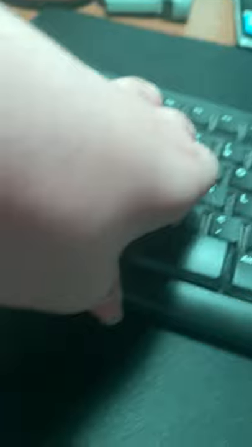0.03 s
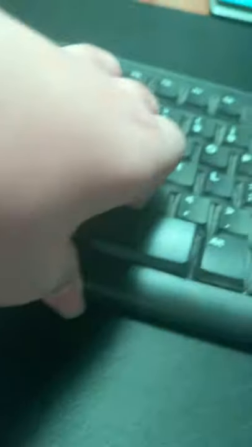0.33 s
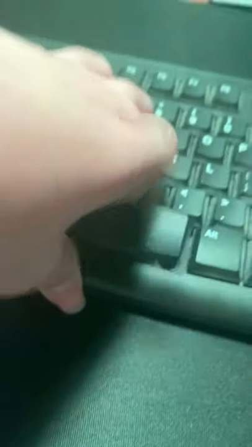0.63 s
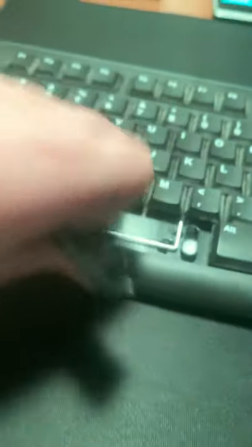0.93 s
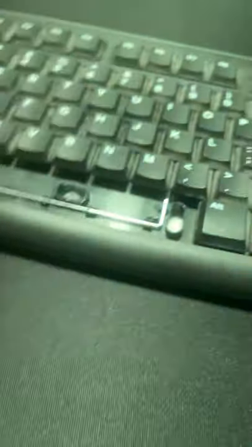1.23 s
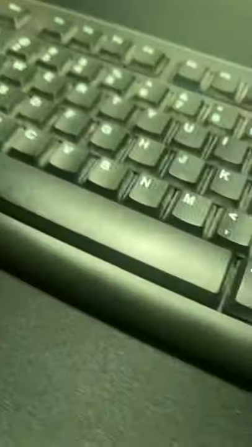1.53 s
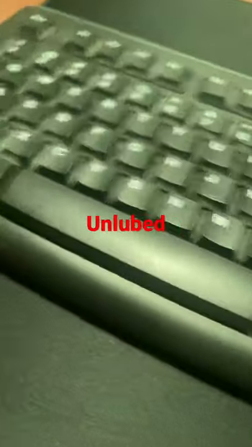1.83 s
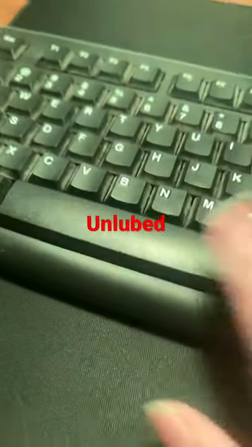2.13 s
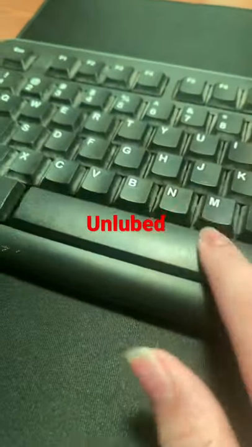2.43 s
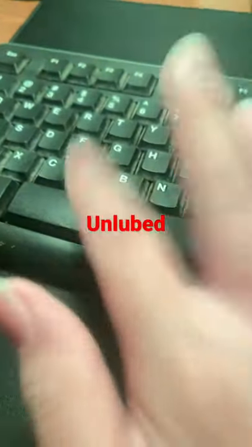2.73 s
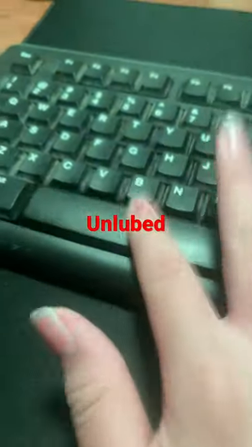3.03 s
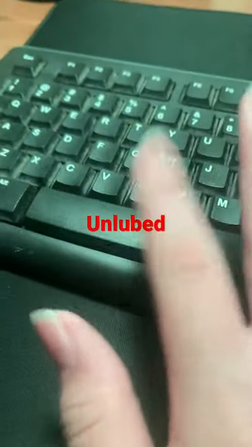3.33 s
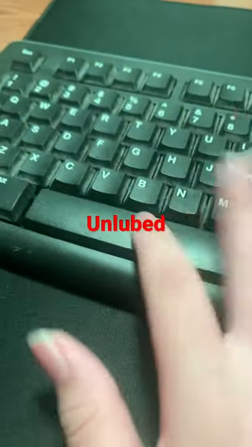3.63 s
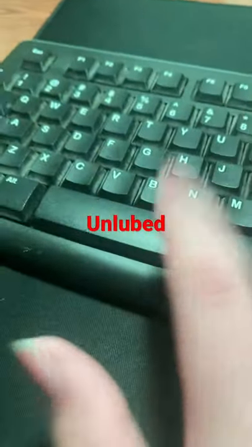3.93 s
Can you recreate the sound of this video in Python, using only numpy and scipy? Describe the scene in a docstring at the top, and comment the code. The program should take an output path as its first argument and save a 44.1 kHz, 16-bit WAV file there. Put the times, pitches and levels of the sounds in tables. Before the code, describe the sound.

Sharp, rattly spacebar presses follow a plastic key snapping off and soft handling bumps.

```python
"""First come soft thumps and rubbing: fingers on a hand-held phone in a quiet room. Close by, a plastic
spacebar snaps off a keyboard on a desk. The fingers fumble on, and all sound drops out for an instant.
Then the refitted, unlubricated spacebar is struck nine times: each press clacks, rattles the wire that
keeps the bar level and booms faintly in the desk, and the key knocks back up a moment later."""
import sys
import numpy as np
from scipy import signal
from scipy.fft import irfft
from scipy.io import wavfile
from scipy.ndimage import uniform_filter1d

SR = 44100
rng = np.random.default_rng(int(sys.argv[2]) if len(sys.argv) > 2 else 0)


def output_pcm(signal):
    """Save a mono or channel-first signal as 16-bit PCM at the path in sys.argv[1].

    Samples are clipped to [-1, 1] before scaling.
    """
    pcm = np.clip(np.atleast_2d(signal).T, -1, 1) * 32767
    wavfile.write(sys.argv[1], SR, np.round(pcm).astype(np.int16))


N = 176400


def amp(db):
    """Turns decibels into a gain."""
    return 10 ** (np.asarray(db) / 20)


def unit_rms(x):
    """Scales a sound to an average (rms) level of 1."""
    return x / np.sqrt(np.mean(x ** 2) + 1e-20)


def look_up(points, hz):
    """Reads between a table's rows on a log-frequency axis."""
    f, value = np.transpose(points)
    return np.interp(np.log(hz + 1), np.log(f), value)


def add(mix, s, sound):
    """Mixes a sound in at s seconds."""
    part = mix[max(round(s * SR), 0):][:len(sound)]
    part += sound[:len(part)]


def noise(colour, size, tilt_db=0):
    """Noise with a colour (a level for each frequency); tilt_db per octave brightens it above 1 kHz."""
    hz = np.fft.rfftfreq(size, 1 / SR)
    gain = amp(look_up(colour, hz) + tilt_db * np.log2(np.maximum(hz, 1000) / 6000))
    return unit_rms(irfft(gain * np.exp(2j * np.pi * rng.random(len(hz))), size))


def burst(colour, t60, rise_s, tilt_db=0):
    """A struck thing rings at many pitches at once: noise that fades by 60 dB in t60 seconds."""
    t = np.arange(SR // 2) / SR
    return noise(colour, len(t), tilt_db) * (1 - np.exp(-t / rise_s)) * amp(-60 * t / t60)


def ring(tones, rise_s, detune):
    """A few fading tones, a little different at every blow."""
    t, out = np.arange(SR // 2) / SR, 0
    for (hz, db, t60), (shift, vary) in zip(tones, rng.uniform(-1.06, 1, (len(tones), 2))):
        tone = np.sin(2 * np.pi * hz * (1 + detune * shift) * t + np.pi * vary / 2)
        out = out + amp(db + 2 * vary - 60 * t / t60) * tone
    return out * (1 - np.exp(-t / rise_s))


# Colour of the quiet room: f/Hz, level/dB
HUSH_COLOUR = [(20, -29.5), (72, -1), (350, -31.5), (750, -10.5), (1700, -35.5), (3500, -31.5), (4300, -41),
               (7000, -36.5), (15000, -47.5)]
def room_hush():
    """The room's faint, steady, low noise."""
    return amp(-62) * noise(HUSH_COLOUR, N)


# How long the echo lasts: f/Hz, t60/s
ECHO_FADE = [(900, 0.25), (5000, 0.47), (15000, 0.41)]
def room_echo(sound, delay_s=0.0069):
    """The walls of a small room send the sound back, each pitch fading at its own speed."""
    hz, t, bands = signal.stft(rng.standard_normal(SR * 3 // 4), SR, nperseg=256)
    fade = amp(-60 * t / look_up(ECHO_FADE, hz)[:, None])
    tail = signal.istft(bands * fade, SR, nperseg=256)[1]
    tail *= np.clip(np.arange(len(tail)) / SR / delay_s - 1, 0, 1)
    return signal.fftconvolve(sound, tail / np.linalg.norm(tail))[:N]


# Colour of a deep thump: f/Hz, level/dB
THUMP_COLOUR = [(28, -31.5), (55, 4), (80, 3.5), (300, -17), (3000, -95.5)]
# How the rumble swells and fades: t/s, level/dB
RUMBLE_LEVELS = [(.85, -54.5), (1.05, -57), (1.3, -50.5), (1.9, -52), (2.6, -69.5)]
def hand_rumble():
    """The phone rumbles in the hand that holds it."""
    level_db = np.interp(np.arange(N) / SR, *np.transpose(RUMBLE_LEVELS))
    return amp(level_db) * noise(THUMP_COLOUR, N)


# Colours of the phone's case and of a plastic tick: f/Hz, level/dB
CASE_COLOUR = [(380, -7), (570, 6.5), (780, 1.5), (1000, -13.5), (6000, -105)]
TICK_COLOUR = [(200, -23), (700, 5), (1200, 0), (2000, -14), (3200, -23.5), (6000, -30.5), (15000, -63.5)]
# Finger slides: t/s, length/s, murmur level/dB, hiss level/dB
FINGER_RUBS = [(0.234, 0.16, -50.5, -55.5), (0.458, 0.16, -41.5, -56.5), (1.206, 0.19, -52, -93),
               (1.621, 0.092, -58.5, -64), (1.714, 0.074, -52, -58), (1.816, 0.067, -48.5, -65),
               (2.029, 0.08, -51.5, -53)]
def finger_rubs():
    """Skin slides with an uneven grip: it hisses and makes the case murmur."""
    out, size = np.zeros(N), SR // 2
    for s, length, murmur_db, hiss_db in FINGER_RUBS:
        progress = np.arange(0, 1, 1 / (length * SR))
        grip = amp(2 * unit_rms(uniform_filter1d(rng.standard_normal(size), size=260)))
        murmur = amp(murmur_db) * noise(CASE_COLOUR, size)
        hiss = amp(hiss_db) * noise(TICK_COLOUR, size, tilt_db=5)
        swell = np.sqrt(abs(np.sin(np.pi * progress)))
        add(out, s, (grip * (murmur + hiss))[:len(swell)] * swell)
    return out


# Clunks and ticks: t/s, level/dB, treble tilt/(dB per octave)
PLASTIC_TICKS = [(0.267, -30, 3), (0.559, -32.5, 5.5), (1.131, -45, 1.5), (1.505, -25.5, -1),
                 (1.514, -25.5, -13), (1.63, -37, -2.5), (1.901, -47, 4.5), (1.923, -48.5, 3.5),
                 (1.968, -46.5, 2.5)]
def plastic_ticks():
    """Small knocks on plastic die away at once."""
    out = np.zeros(N)
    for s, db, tilt_db in PLASTIC_TICKS:
        add(out, s, amp(db) * burst(TICK_COLOUR, t60=0.027, rise_s=0.00023, tilt_db=tilt_db))
    return out


def push(colour):
    """One push on the phone, its low notes lagging behind its high ones."""
    hz = np.fft.rfftfreq(SR // 4, 1 / SR)
    delay_s = 0.0067 * (200 / np.maximum(hz, 45)) ** 0.879
    phase = -2 * np.pi * np.cumsum(delay_s) * hz[1]
    wave = irfft(amp(look_up(colour, hz)) * np.exp(1j * phase))[:SR // 8]
    fade_in = np.minimum(np.arange(len(wave)) / 20, 1)
    return fade_in * wave / abs(wave).max()


# Bumps on the phone: t/s, thump level/dB, knock level/dB
FINGER_BUMPS = [(0.107, -26.5, -40.5), (.167, -46, -31), (1.301, -30.5, -26), (1.506, -23, -48),
                (1.540, -31, -45.5), (1.684, -38, -65), (1.727, -71, -35), (1.78, -37.5, -65),
                (1.853, -41, -35.5), (1.924, -36.5, -74), (2.094, -24.5, -30)]
def finger_bumps():
    """A finger hits the phone: a deep thump plus a knock from the case."""
    out = np.zeros(N)
    for s, thump_db, knock_db in FINGER_BUMPS:
        add(out, s - 0.001, amp(thump_db) * push(THUMP_COLOUR) + amp(knock_db) * push(CASE_COLOUR))
    return out


# Colour of a crack: f/Hz, level/dB
CRACK_COLOUR = [(450, -52), (680, -3), (1020, 0), (1500, -9.5), (2250, -4), (2650, -19.5), (3150, 0),
                (4350, -12), (7000, -4.5), (8500, -13.5), (15000, -18.5), (16200, -39.5)]
# The clips let go: t/s, level/dB
CLIP_CRACKS = [(0.7004, -42.5), (0.7084, -21), (0.7114, -16.5), (0.7185, -20.5), (0.728, -35.5)]
def spacebar_snap():
    """The bar tears out of its clips in a quick cluster of cracks."""
    out = np.zeros(N)
    for s, db in CLIP_CRACKS:
        add(out, s, amp(db) * burst(CRACK_COLOUR, t60=0.052, rise_s=0.00075))
    return out


# Tones of the hollow bar, its "thock": f/Hz, level/dB, t60/s
THOCK_TONES = [(675, -14, 0.043), (953, 3, 0.033), (1003, 1.5, 0.016)]
# Colour of the key's click: f/Hz, level/dB
CLICK_COLOUR = [(350, -24), (750, -6), (1400, 2.5), (2050, -3), (3600, 4.5), (4400, -6.5), (6200, 0),
                (15500, -11)]
# Light knocks of the key: t/s, click level/dB, thock level/dB
KEY_RETURNS = [(0.895, -38.5, -42.5), (2.336, -37.5, -71), (2.535, -47, -45.5), (2.7247, -38, -38.5),
               (2.92, -41, -61), (3.121, -34, -33), (3.333, -32, -34), (3.538, -32.5, -32.5),
               (3.762, -33, -32), (3.982, -30.5, -33)]
def spacebar_returns():
    """The key springs back, or a finger taps it: a soft click and a hollow thock."""
    out = np.zeros(N)
    for s, db, thock_db in KEY_RETURNS:
        add(out, s, amp(db) * burst(CLICK_COLOUR, t60=0.05, rise_s=0.0017))
        add(out, s + 0.0015, amp(thock_db) * ring(THOCK_TONES, rise_s=0.0014, detune=0.041))
    return out


# Colour of the clack: f/Hz, level/dB
CLACK_COLOUR = [(350, -29), (700, 8.5), (1900, 2), (2300, -1), (3150, 4), (3900, 5), (4500, -2),
                (6100, 7.5), (8700, -4), (9400, 6.5), (10800, 2), (11400, -7), (12100, 0), (13100, -3),
                (15200, -6), (16200, -26)]
# Tones of the wire: f/Hz, level/dB, t60/s
WIRE_TONES = [(3580, 1, 0.046), (3665, 5, 0.044), (3920, -10.5, 0.096), (6790, -10, 0.14),
              (6280, -13, 0.18), (9350, -19.5, 0.16)]
# The key hits bottom: t/s, level/dB, touch comes earlier by/s, thock level/dB, tilt/(dB per octave)
KEY_PRESSES = [(2.240, -34.5, 0.0039, -36, -1.5), (2.447, -33.5, .005, -25.5, -0.5),
               (2.644, -27.5, 0.0066, -39, 2.5), (2.844, -27, 0.0046, -26.5, 3),
               (3.043, -24.5, .001, -27.5, 0.5), (3.253, -19.5, 0.0029, -25, 2),
               (3.458, -26, 0.0022, -32, 2.5), (3.684, -26, 0.0018, -38, -.5), (3.909, -21, 0.0033, -30, 2)]
def spacebar_presses(bounce_gap_s=0.0083, bounce_loss_db=3.5):
    """A finger lands, the bar clacks down, its wire bounces twice and rings, and the desk booms."""
    out = np.zeros(N)
    hz, clack_db = np.transpose(CLACK_COLOUR)
    desk_colour = np.multiply(THUMP_COLOUR, [1.26, 1])  # pitched above a thump on the phone
    for s, db, lead_s, thock_db, tilt_db in KEY_PRESSES:
        # Each press lands elsewhere on the bar, so its colour differs.
        colour = np.column_stack([hz, clack_db + 2 * rng.standard_normal(len(hz))])
        touch = burst(colour, t60=0.12, rise_s=0.000097, tilt_db=tilt_db)
        clack = burst(colour, t60=0.047, rise_s=0.00086, tilt_db=tilt_db)
        add(out, s - lead_s, amp(db - 11) * touch)
        add(out, s, amp(db) * clack)
        for k, slip in enumerate(rng.uniform(-0.24, 0.23, 2), 1):
            bounce = burst(colour, t60=0.045, rise_s=0.00086, tilt_db=tilt_db)
            add(out, s + (k + slip) * bounce_gap_s, amp(db - k * bounce_loss_db) * bounce)
        add(out, s + 0.00158, amp(thock_db) * ring(THOCK_TONES, rise_s=0.002, detune=0.066))
        add(out, s, amp(db - 4) * ring(WIRE_TONES, rise_s=0.0028, detune=0.0357))
        add(out, s, amp(db - 21) * burst(desk_colour, t60=0.35, rise_s=0.0074))
    return out


def scene(echo_swap_hz=26.84):
    """The spacebar and two echoes that take turns, over the hand's noises and the room's hush."""
    keys = spacebar_presses() + spacebar_returns() + spacebar_snap()
    turn = 2 * np.pi * echo_swap_hz * np.arange(N) / SR
    echo = room_echo(keys * np.cos(turn)) + room_echo(keys * np.sin(turn))
    hand = finger_bumps() + plastic_ticks() + finger_rubs() + hand_rumble()
    return (keys + amp(-7.5) * echo + hand + room_hush())[None]


# Silent stretches: start t/s, end t/s
SILENCES = [(-1, .087), (1.570, 1.622)]
def record(dry, top_hz=16100):
    """The sound starts from silence, drops out once, briefly, and loses its highest treble."""
    t, audible = np.arange(N) / SR, np.ones(N)
    for start, end in SILENCES:
        audible[(t > start) & (t < end)] = 0
    gated = dry * uniform_filter1d(audible, size=40)
    low_pass = signal.firwin(255, top_hz, window=("kaiser", 9), fs=SR)
    return signal.oaconvolve(gated, low_pass[None], "same")


dry = scene()
out = record(dry)
output_pcm(out)
```